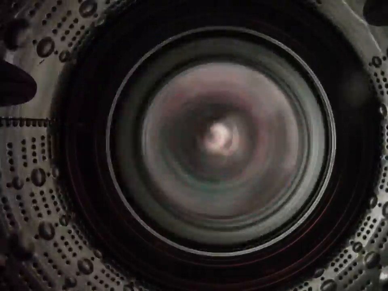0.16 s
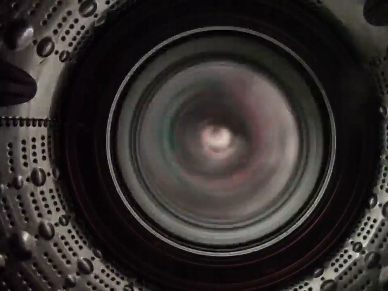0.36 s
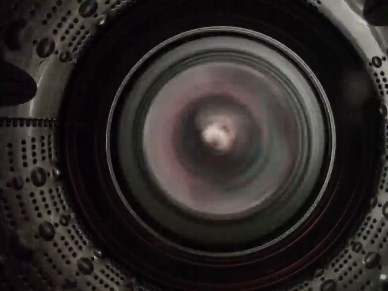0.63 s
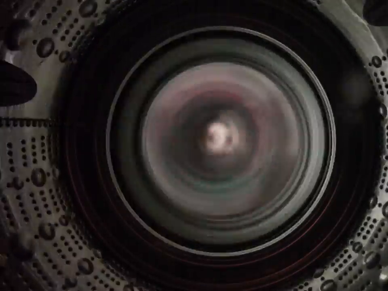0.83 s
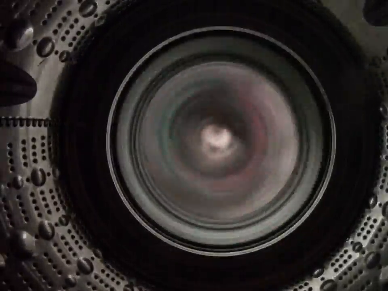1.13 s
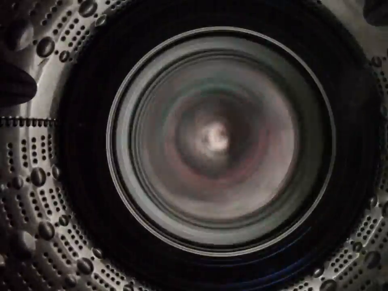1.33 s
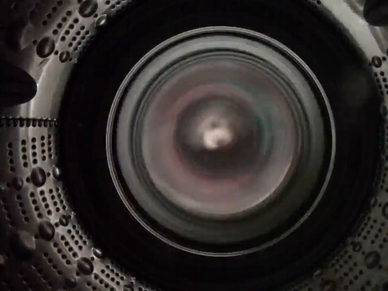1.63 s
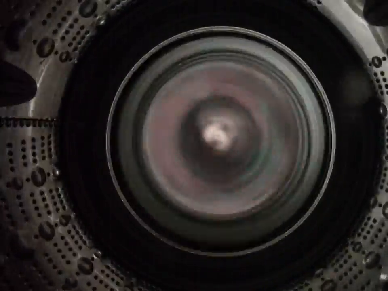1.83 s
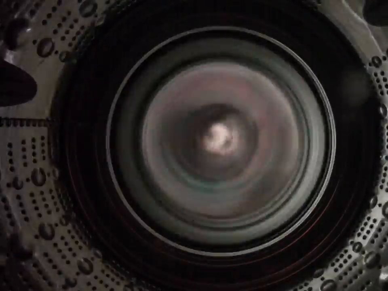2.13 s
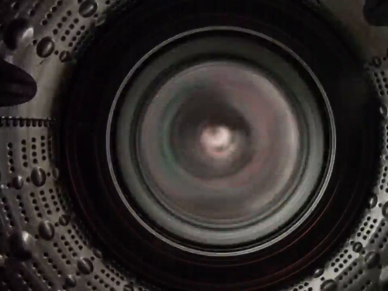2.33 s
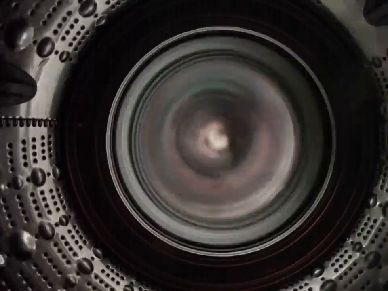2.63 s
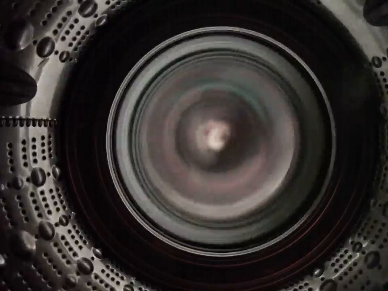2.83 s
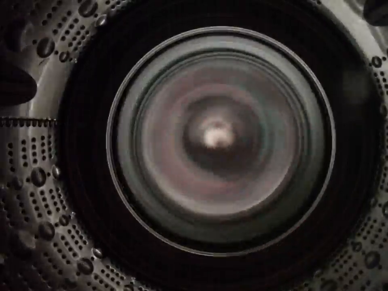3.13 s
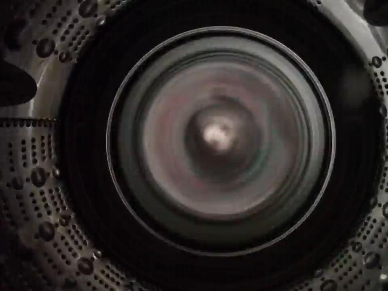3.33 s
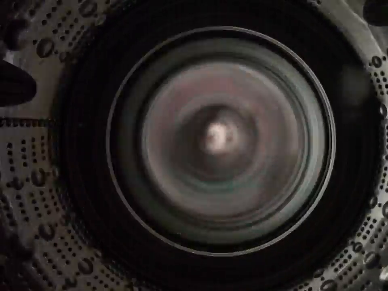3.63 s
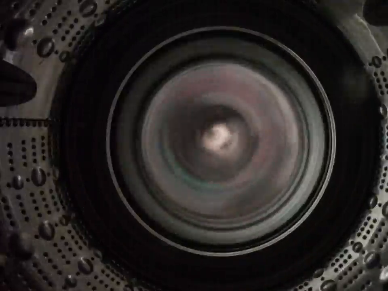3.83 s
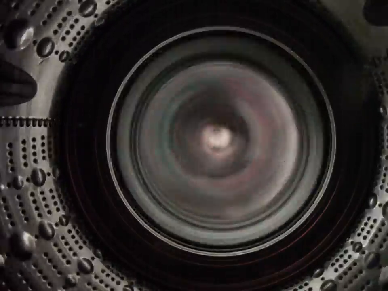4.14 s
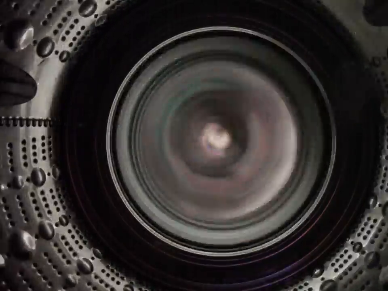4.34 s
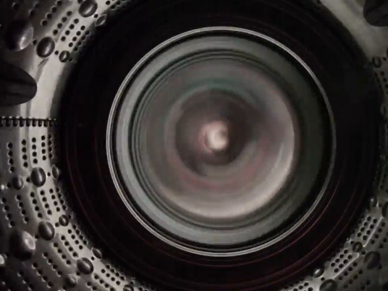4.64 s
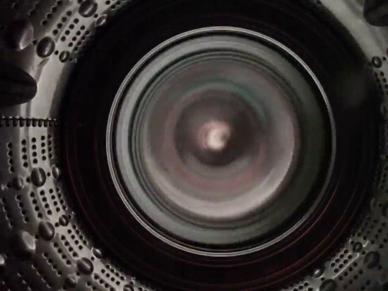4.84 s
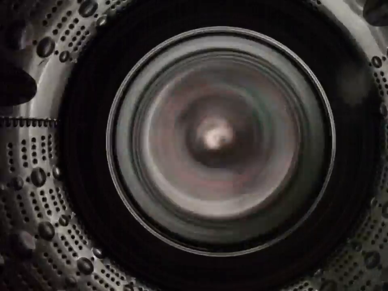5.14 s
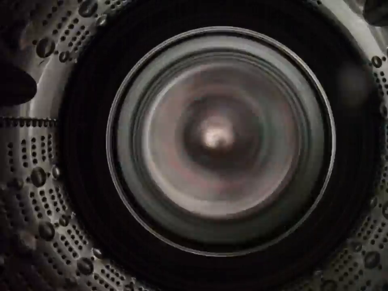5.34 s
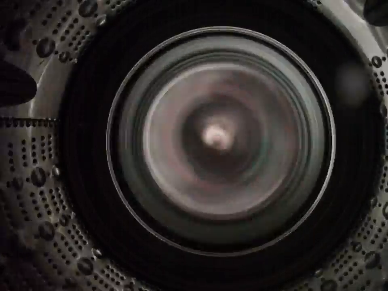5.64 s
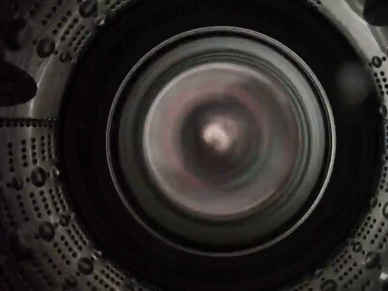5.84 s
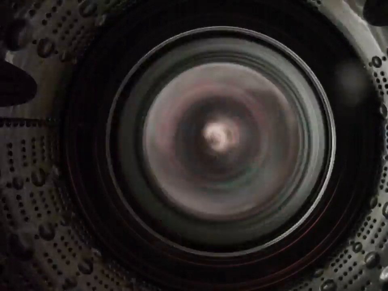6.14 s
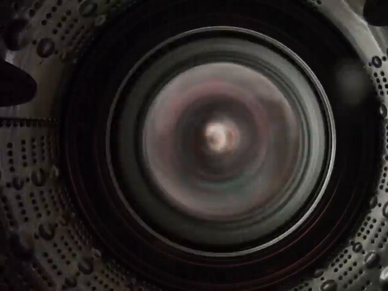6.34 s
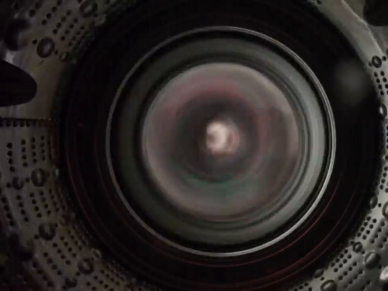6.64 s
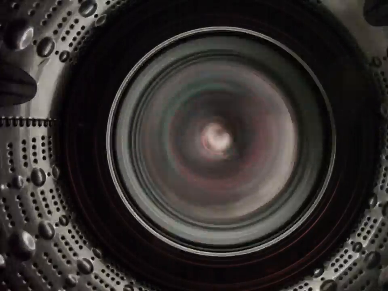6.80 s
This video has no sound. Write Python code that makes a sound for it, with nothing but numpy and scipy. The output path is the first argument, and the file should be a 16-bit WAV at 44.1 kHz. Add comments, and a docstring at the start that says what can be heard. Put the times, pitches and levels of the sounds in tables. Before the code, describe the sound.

Heard from inside the steel drum of a washing machine during a fast spin. A heavy low boom throbs unevenly about nine times a second, with a rattling panel drone in quick bursts. Above it a motor hum and thin whine rise slowly in pitch, amid steady bearing roar and air hiss. Brief soft sprays of water strike the tub now and then. The microphone is very close, in a hollow metal space.

```python
"""A lopsided drum booms inside a washing machine, slowly gaining speed from nine to almost ten turns a second.
Tub harmonics beat into a throb that swells with each lap of the belt, over a frame rumble; a panel drones in bursts.
The motor hums and whines above, as sideband clusters and slot lines that climb with the speed.
Shaped noise gives the roar of bearings and air in the steel cavity; grainy noise bursts are water hitting the tub."""
import sys
import numpy as np
from scipy import signal
from scipy.fft import rfft, irfft, next_fast_len
from scipy.io import wavfile

SR = 44100
rng = np.random.default_rng(int(sys.argv[2]) if len(sys.argv) > 2 else 0)


def store_wav(level_fs):
    """Save 16-bit WAV to argv[1]."""
    pcm = np.round(np.clip(np.atleast_2d(level_fs), -1, 1) * 32767)
    wavfile.write(sys.argv[1], SR, pcm.T.astype(np.int16))


N = 307377
T = np.arange(N) / SR
EARLY_S, MIDDLE_S, LATE_S = 0.3, 3.5, 6.7  # moments that the early, middle and late levels refer to
BELT_RATIO = 12.017  # motor turns per drum turn
BELT_LAPS = 0.551  # belt laps per drum turn
HOUSING_HZ, HOUSING_WIDTH_HZ = 1358.5, 6  # motor housing resonance
LURCH_S, SHUDDER_S, HUM_SWELL_S = 0.08, 0.028, 0.55  # from the peak of a swell to 1/e of its dB gain
TOP_HZ = 15100  # upper edge of the sound

# Drum speed: t/s, speed/(turns per s)
DRUM_SPEED = [(0, 8.97405), (7, 9.87115)]
# Low rumble of the tub: f/Hz, density/dB per Hz
TUB_RUMBLE = [(15, -78), (43, -55.5), (60, -55), (86, -63), (102, -54), (114, -61), (155, -57),
              (200, -60.5), (236, -58), (249, -71.5), (268, -62.5), (316, -54.5), (350, -59), (392, -73.5)]
# Bearing roar, before it rises with speed: f/Hz, density/dB per Hz
BEARING_ROAR = [(330, -85), (400, -72.5), (529, -63.5), (661, -74.5), (741, -69.5), (819, -80),
                (886, -76.5), (925, -72), (1180, -69.5), (1260, -71), (1434, -67), (1720, -71.5),
                (2000, -69.5), (2303, -70.5), (2560, -83.5), (3200, -105)]
# Air hiss, before it rises with speed: f/Hz, density/dB per Hz
AIR_HISS = [(1800, -97.5), (2600, -84), (3050, -86.5), (4033, -88.5), (4364, -94), (4962, -92.5),
            (5753, -96.5), (5985, -101), (6671, -101.5), (7290, -108), (9057, -118)]
# Faint steady hiss at the very top: f/Hz, density/dB per Hz
STEADY_HISS = [(6500, -111), (8046, -107.5), (9057, -113), (11200, -113), (12600, -119), (14800, -118)]
# Steel cavity modes, before the roar rises with speed: f/Hz, width/Hz before broadening, peak density/dB per Hz
CAVITY_MODES = [(436, 14, -66.5), (1061.5, 20, -62), (1177, 62, -70), (1370, 27, -69.5), (1441, 25, -67),
                (1647, 20, -74), (1838, 46, -67.5), (1977, 22, -72), (2720, 35, -86.5), (3170, 36, -80),
                (3413, 46, -85.5), (3540, 32, -89.5), (3806, 48, -87), (4955, 160, -90.5),
                (6200, 110, -100)]
# Water spits: t/s, level/dB before the attack and decay, t60/s
WATER_SPITS = [(1.319, -66, 0.22), (3.233, -50.5, 0.23), (3.363, -63, 0.18), (4.031, -54.5, .17),
               (5.029, -61, .12), (5.994, -60, .3), (6.369, -62.5, .2)]
# Relative colour of the water spray: f/Hz, level/dB
SPRAY_COLOUR = [(2500, -18), (5000, 7), (8000, 1), (11800, -7), (12700, -14)]
# Narrow steady tones of the motor drive: f/Hz, level/dB
DRIVE_TONES = [(9998, -96.5), (14097, -100.5), (14740, -89.5)]
# Motor slot lines: sideband/drum rates, housing lift/dB, then early, middle and late level/dB before the lift
SLOT_WHINE = [(0, 2.5, -43, -48, -56), (-2, 17, -69, -60.5, -62)]
# Motor hum lines before the hum trim: multiple of motor rate, sideband/drum rates,
# then early, middle and late level/dB
MOTOR_LINES = [(2, -1, -42.5, -46.5, -50), (3, -3, -39.5, -45.5, -54.5), (3, -2, -37, -42, -59),
               (3, -1, -31.2, -37, -45), (3, 0, -32.7, -39.5, -46), (3, 1, -42.5, -34, -40.5),
               (3, 2, -47.5, -53, -51), (4, -1, -52, -50, -53), (4, 2, -53, -63, -60.5),
               (6, 0, -50, -53.5, -57), (6, 2, -58, -59, -58), (12, 1, -60.5, -56, -59)]
# Brief swells of the hum: t/s, gain/dB
HUM_SWELLS = [(2.2, 1.5)]
# Panel level before bursts and shudders: early, middle and late level/dB
PANEL_LEVEL = (-36.5, -39, -32.5)
# Turns on which the panel shudders harder: t/s, gain/dB
PANEL_SHUDDERS = [(0.49, 2), (1.05, 7), (1.82, 9), (3.10, 3), (3.94, 8.5), (4.16, 9), (6.84, 5)]
# Drum harmonics that shake the frame: multiple of drum rate, then early, middle and late level/dB
FRAME_LINES = [(1, -32.5, -28.5, -33), (3, -46, -42.5, -34.5), (4, -44.5, -39, -42.5),
               (8, -38.5, -39, -38.5), (9, -59.5, -46, -41.3), (10, -45.5, -38, -39),
               (11, -47.5, -46.5, -52), (12, -59, -52, -52), (28, -65, -48.5, -43), (30, -47.5, -46, -40.5)]
# Drum harmonics near the tub resonance, before the belt swing and lurches:
# multiple of drum rate, then early, middle and late level/dB
BOOM_LINES = [(5, -55, -35.5, -28.5), (6, -39, -23.5, -19.5), (7, -21, -20.5, -20.5)]
# Belt tug on the boom: early, middle and late depth/dB
BELT_SWING = (3.6, 1.9, 1.5)
# Load lurches that swell or sag the boom: t/s, gain/dB
LOAD_LURCHES = [(0.16, -2.5), (0.76, 3.5), (1.14, 5), (1.89, -2), (2.36, 2), (4.55, 2.5), (4.88, 2.5),
                (5.38, 2)]


def undb(db):
    """Decibels to gain."""
    return 10 ** (np.asarray(db) / 20)


def ramp(levels):
    """Glide from early through middle to late as the speed builds."""
    return np.interp(T, [EARLY_S, MIDDLE_S, LATE_S], levels)


def run_up(levels_db):
    """Peak amplitude of a line whose rms level follows the run-up."""
    return np.sqrt(2) * undb(ramp(levels_db))


def swells(rows, width_s):
    """Gain in dB of smooth bell-shaped swells and sags."""
    return sum(db * np.exp(-((T - peak) / width_s) ** 2) for peak, db in rows)


def unit(x):
    """Scale to rms 1."""
    return x / np.sqrt(np.mean(x ** 2))


def noise(gain_at):
    """White noise shaped so that its density per Hz follows a function of frequency."""
    size = next_fast_len(N, True)
    hz = np.maximum(np.fft.rfftfreq(size, 1 / SR), 1)
    spectrum = rfft(rng.standard_normal(size)) * gain_at(hz)
    return irfft(spectrum, size)[:N] * np.sqrt(SR / 2)


def coloured(points):
    """Noise with a drawn spectrum that falls away steeply beyond its ends."""
    f, db = np.array(sorted(points)).T

    def gain_at(hz):
        inside = undb(np.interp(np.log(hz), np.log(f), db))
        skirts = np.minimum(1, np.minimum(hz / f[0], f[-1] / hz)) ** 4
        return inside * skirts
    return noise(gain_at)


def resonance(hz, centre_hz, width_hz):
    """Complex response of one mode, gain 1 at its centre."""
    return 1 / (1 + 1j * (hz ** 2 - centre_hz ** 2) / (hz * width_hz))


def ringing(centre_hz, width_hz):
    """A mode shaken at random, applied twice for steep skirts; rms 1."""
    return unit(noise(lambda hz: resonance(hz, centre_hz, width_hz) ** 2))


def walk(rate_hz):
    """Smooth random drift with rms 1."""
    return unit(noise(lambda hz: np.exp(-(hz / max(rate_hz, 1)) ** 2)))


def once_a_turn(turns, at, depth_db):
    """Gain of rms 1 that swells when the heavy side of the load passes."""
    return unit(undb(depth_db * np.cos(2 * np.pi * (turns - at))))


def rush(turns, rate, roar_rise_db=2.1, hiss_rise_db=4.0):
    """Bearings and air roar in the cavity, louder with speed and swelling slightly each turn."""
    pace = (rate - rate.mean()) / np.ptp(rate)
    broadening = 1.54
    cavity = noise(lambda hz: sum(undb(db) * abs(resonance(hz, f, broadening * width)) ** 2
                                  for f, width, db in CAVITY_MODES))
    roar = (coloured(BEARING_ROAR) + cavity) * undb(roar_rise_db * pace + 0.65 * walk(25))
    hiss = coloured(AIR_HISS) * undb(hiss_rise_db * pace + 0.5 * walk(25))
    steady = coloured(TUB_RUMBLE) + coloured(STEADY_HISS)
    return steady + (roar + hiss) * once_a_turn(turns, at=0.9, depth_db=0.4)


def water(attack_s=0.005, grain_db=-0.5):
    """Flung water hits the tub wall as short, grainy sprays."""
    envelope = 0
    for start, db, t60 in WATER_SPITS:
        age = np.maximum(T - start, 0)
        attack = 1 - np.exp(-age / attack_s)
        decay = np.exp(-np.log(1000) * age / t60)
        envelope = envelope + undb(db) * attack * decay
    spray = coloured(SPRAY_COLOUR) * undb(grain_db * walk(400))
    return envelope * unit(spray)


def whine(shaft, turns, rate):
    """The twelve motor slots whine; each line flares as it climbs through a resonance of the housing."""
    slots = 12
    out = 0
    for side, lift_db, *levels in SLOT_WHINE:
        side = round(side)
        line_hz = (slots * BELT_RATIO + side) * rate
        near = abs(resonance(line_hz, HOUSING_HZ, HOUSING_WIDTH_HZ))
        line = np.cos(2 * np.pi * (slots * shaft + side * turns))
        out = out + run_up(levels) * undb(lift_db * near) * line
    return out


def motor(turns, rate, hum_trim_db=-0.2, loaded_at=0.19, dispersion=0.27, waver_db=1.06, slip=0.0025):
    """The load drags on the belt each turn and puts sidebands round the motor lines."""
    shaft = BELT_RATIO * turns + slip * walk(6.8)  # motor turns
    hum = 0
    for k, side, *levels in MOTOR_LINES:
        angle = 2 * np.pi * (k * shaft + side * (turns - loaded_at))
        # odd sidebands, from speed ripple, stand in quadrature; even ones flutter the hum twice a turn
        angle = angle + side % 2 * np.pi / 2
        # the housing delays each sideband differently, which softens the flutter
        angle = angle + dispersion * (side + 0.5) ** 2
        waver = unit(undb(waver_db * k / 3 * walk(14)))
        hum = hum + run_up(levels) * waver * np.cos(angle)
    hum = hum * undb(hum_trim_db + swells(HUM_SWELLS, HUM_SWELL_S))
    drive = sum(undb(db) * ringing(hz, 30) for hz, db in DRIVE_TONES)
    return hum + whine(shaft, turns, rate) + drive


def panel(turns, order=16, locked_db=(-7, 2, 12), burst_db=(5, 6.5, 7.5), waver_db=1.36):
    """A panel drones in a burst each turn; it locks to the drum as a harmonic climbs into its resonance."""
    locked = run_up(locked_db)  # steady line against the loose ringing
    drone = locked * np.cos(2 * np.pi * order * turns) + ringing(155.4, 56)
    drone = drone / np.sqrt(1 + locked ** 2 / 2)  # even power at any mix
    level_db = ramp(PANEL_LEVEL) + swells(PANEL_SHUDDERS, SHUDDER_S) + waver_db * walk(4.6)
    return drone * once_a_turn(turns, at=0.34, depth_db=ramp(burst_db)) * undb(level_db)


def frame(turns, waver_db=1.5):
    """Weaker drum harmonics, each by its own path through the frame."""
    out = 0
    for k, *levels in FRAME_LINES:
        line = np.cos(2 * np.pi * (round(k) * turns + rng.random()))
        out = out + run_up(levels) * undb(waver_db * walk(2.0)) * line
    return out


def swing(turns, tight_at=0.29, load_at=0.21, beat_share=0.5, waver_db=0.16):
    """Boom gain: the uneven belt tugs the tub once a lap and beats against the turning load."""
    laps = BELT_LAPS * turns - tight_at
    beat = np.cos(2 * np.pi * (turns - load_at - laps))
    tug = np.cos(2 * np.pi * laps) + beat_share * beat
    return undb(ramp(BELT_SWING) * tug + waver_db * walk(7.1))


def tub(turns, rate, heavy_at=-0.072, creep_per_s=0.0504, tub_hz=52.7, tub_width_hz=6, slosh_db=-42):
    """The unbalance pushes the tub every turn; harmonics near its resonance beat into a heavy throb."""
    # the tub trails the drum further as the speed builds; angles in turns
    trailing = turns - heavy_at - creep_per_s * T
    boom = undb(slosh_db) * ringing(61.8, 19)
    for k, *levels in BOOM_LINES:
        k = round(k)
        lag = np.angle(resonance(k * rate, tub_hz, tub_width_hz))
        boom = boom + run_up(levels) * np.cos(2 * np.pi * k * trailing + lag)
    return boom * swing(turns) * undb(swells(LOAD_LURCHES, LURCH_S))


def scene():
    """Layer the machine from rush to boom, with the rotating parts tied to the drum angle."""
    rate = np.interp(T, *np.array(DRUM_SPEED).T)
    turns = np.cumsum(rate) / SR
    background = rush(turns, rate) + water()
    machine = motor(turns, rate) + panel(turns) + frame(turns) + tub(turns, rate)
    return (background + machine)[None]


def record(dry):
    """Fade in over 2 ms and cut the top with a steep low-pass."""
    opening = np.minimum(T / 0.002, 1)
    low_pass = signal.ellip(10, 0.1, 80, TOP_HZ, fs=SR, output="sos")
    return signal.sosfilt(low_pass, dry * opening)


dry = scene()
out = record(dry)
store_wav(out)
```